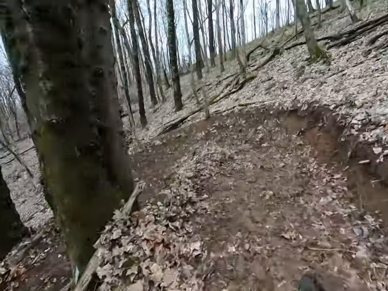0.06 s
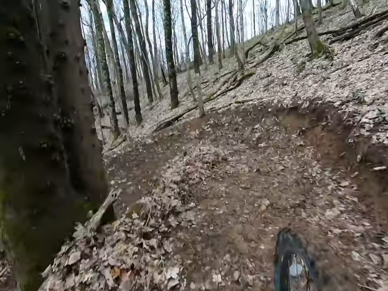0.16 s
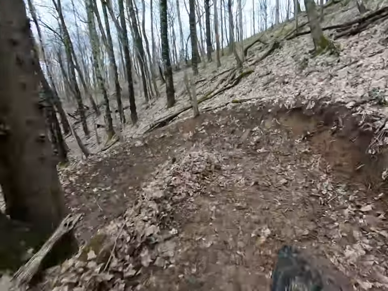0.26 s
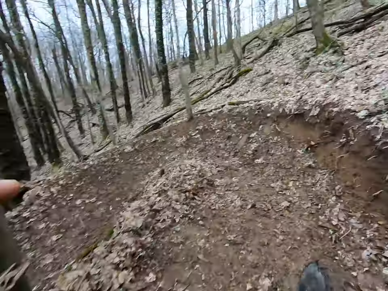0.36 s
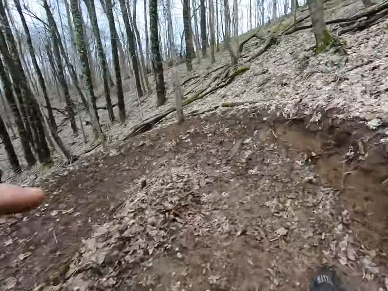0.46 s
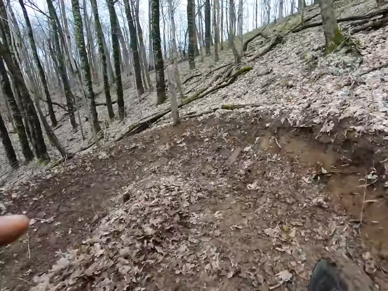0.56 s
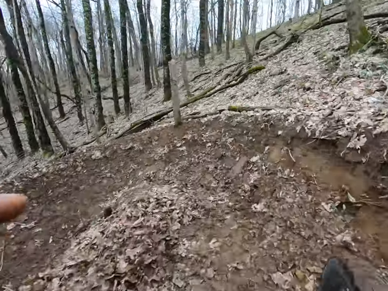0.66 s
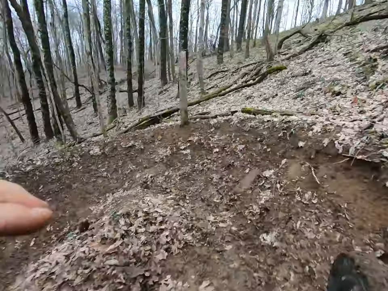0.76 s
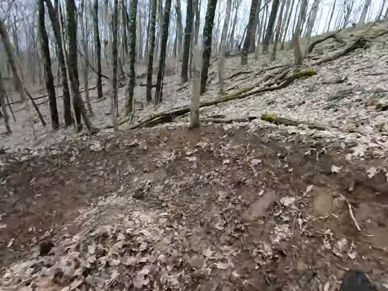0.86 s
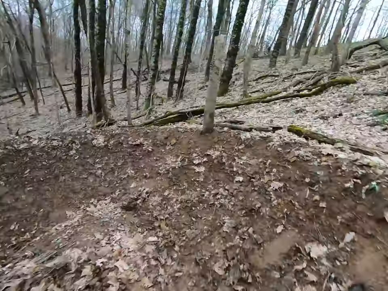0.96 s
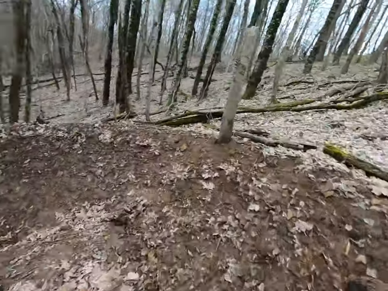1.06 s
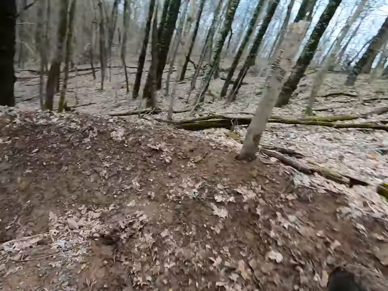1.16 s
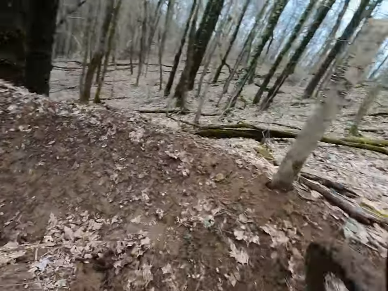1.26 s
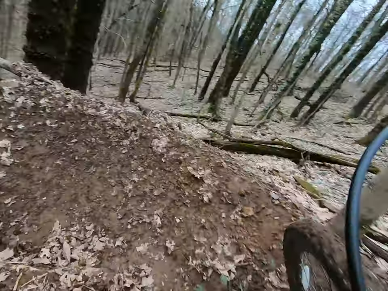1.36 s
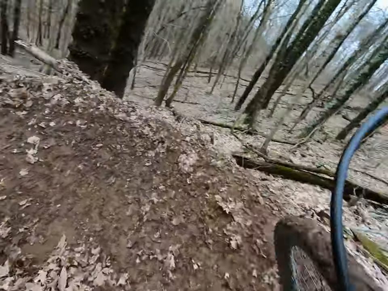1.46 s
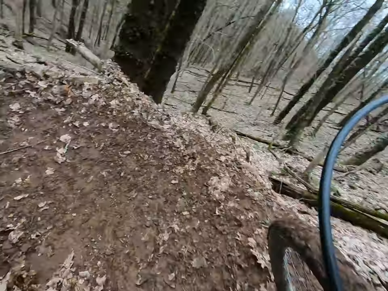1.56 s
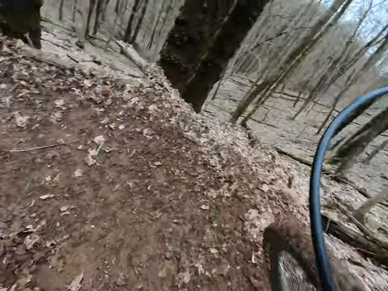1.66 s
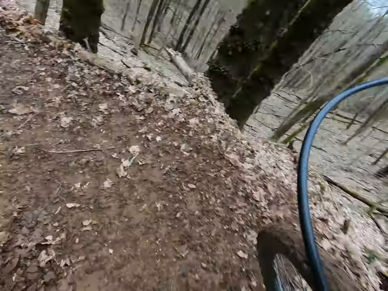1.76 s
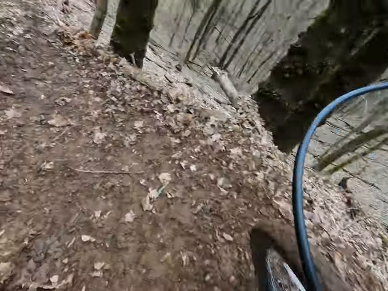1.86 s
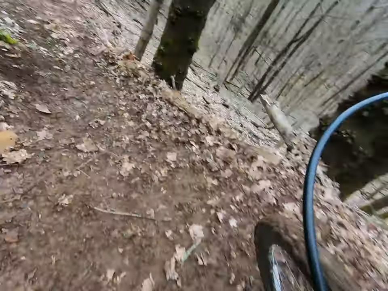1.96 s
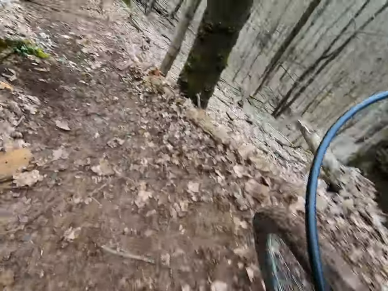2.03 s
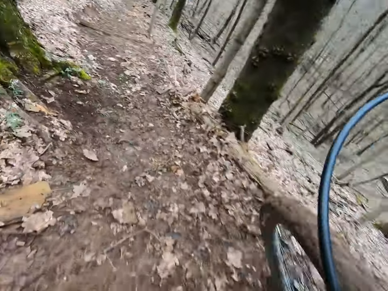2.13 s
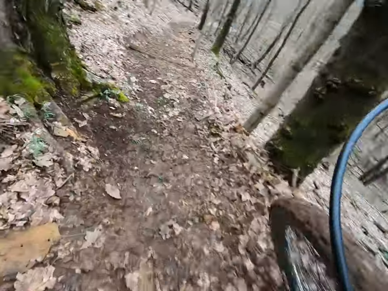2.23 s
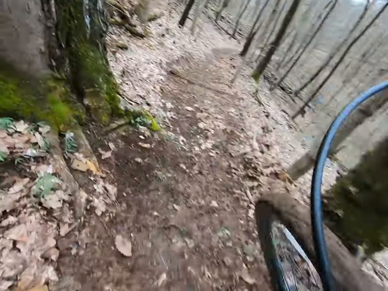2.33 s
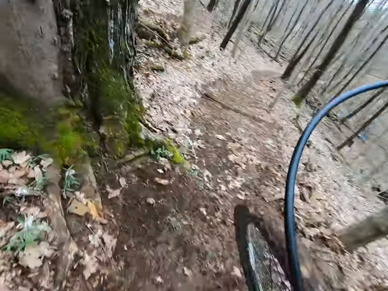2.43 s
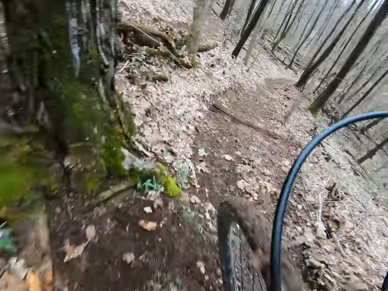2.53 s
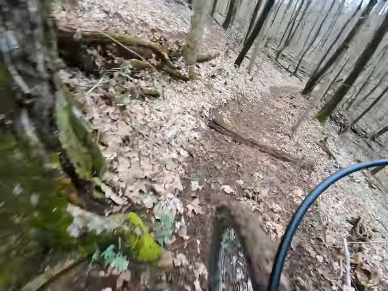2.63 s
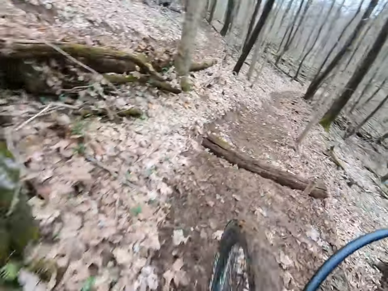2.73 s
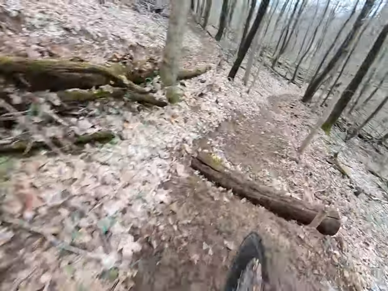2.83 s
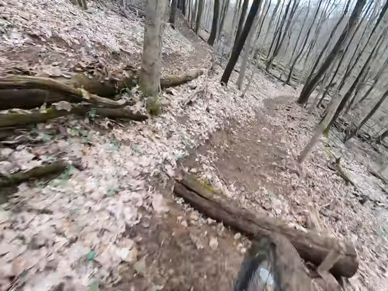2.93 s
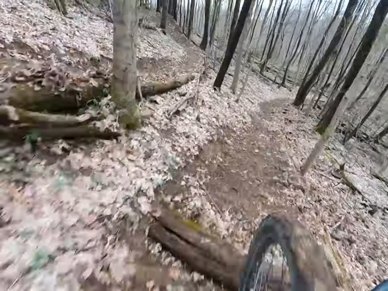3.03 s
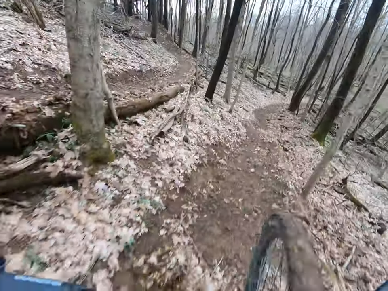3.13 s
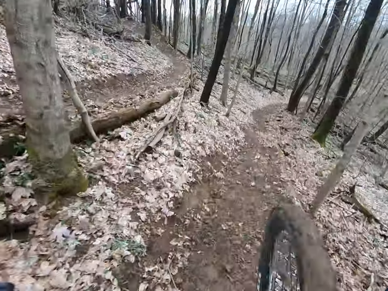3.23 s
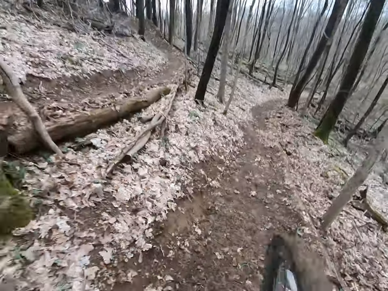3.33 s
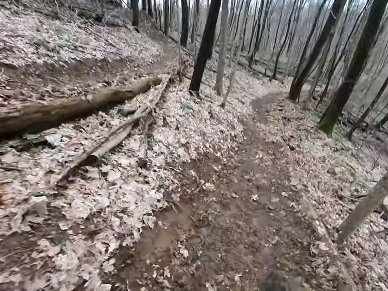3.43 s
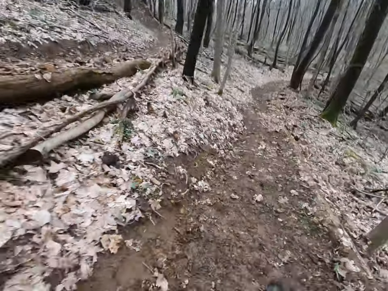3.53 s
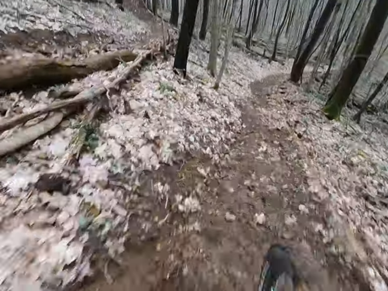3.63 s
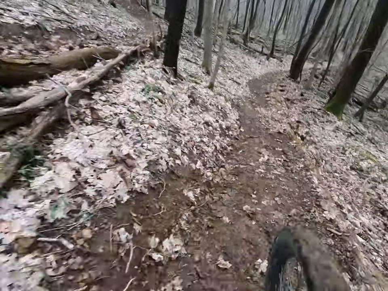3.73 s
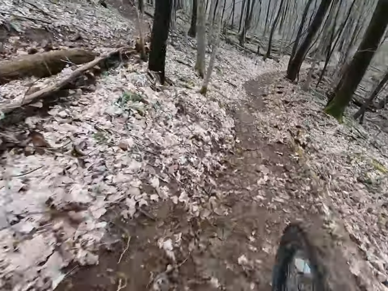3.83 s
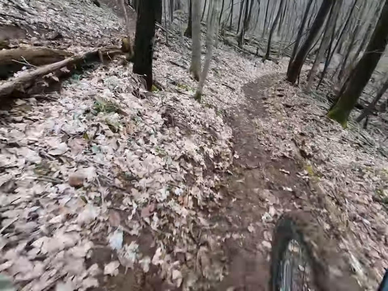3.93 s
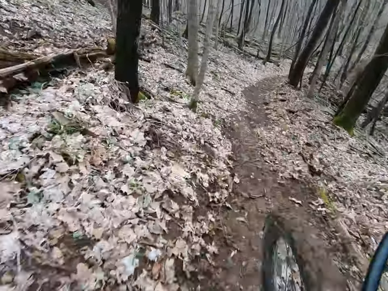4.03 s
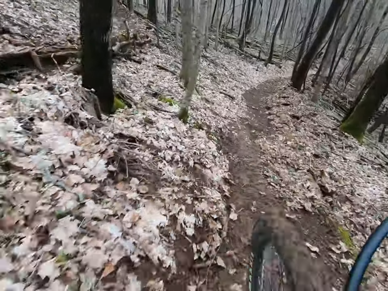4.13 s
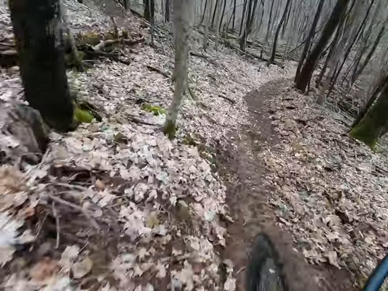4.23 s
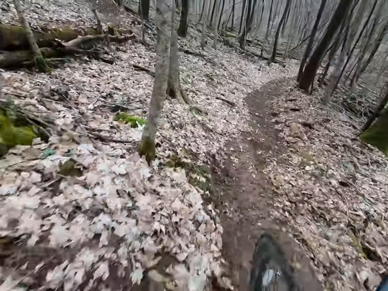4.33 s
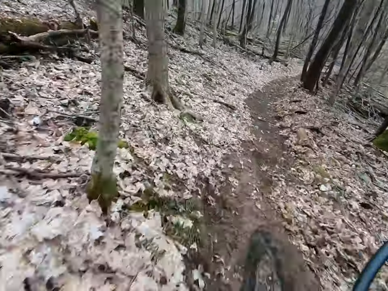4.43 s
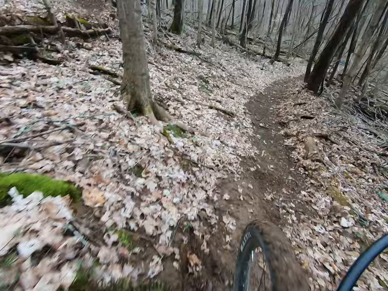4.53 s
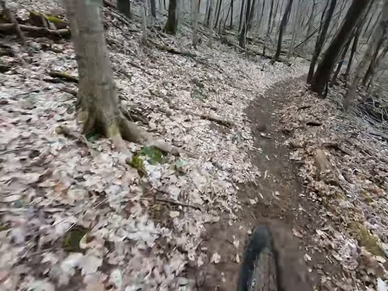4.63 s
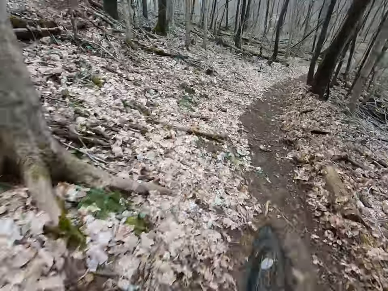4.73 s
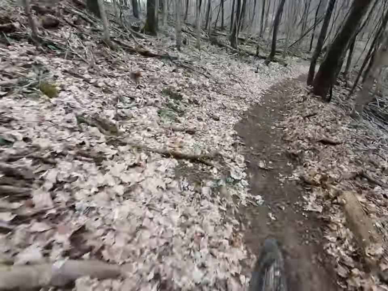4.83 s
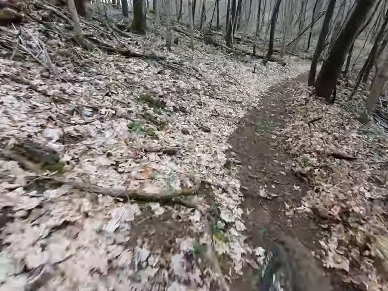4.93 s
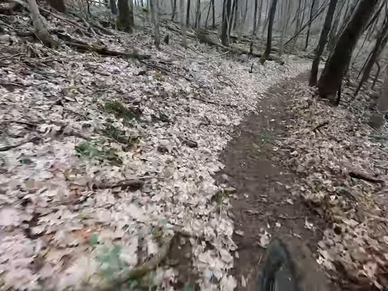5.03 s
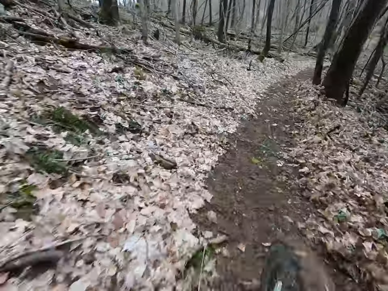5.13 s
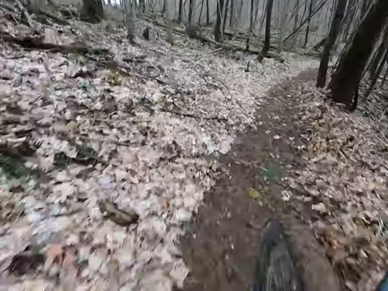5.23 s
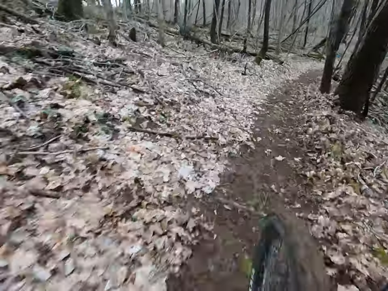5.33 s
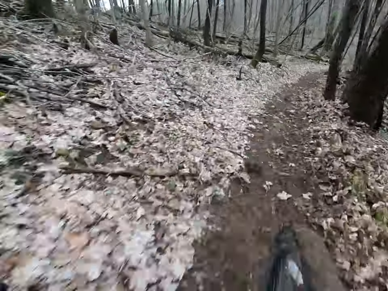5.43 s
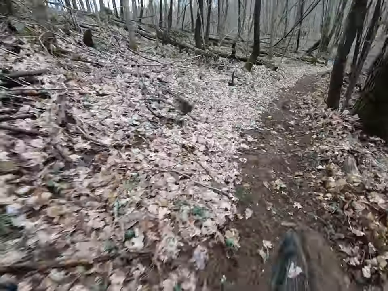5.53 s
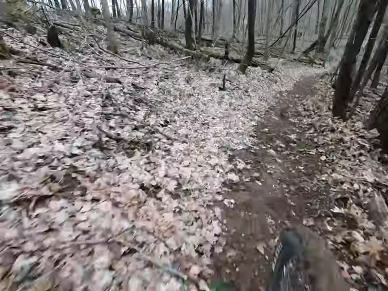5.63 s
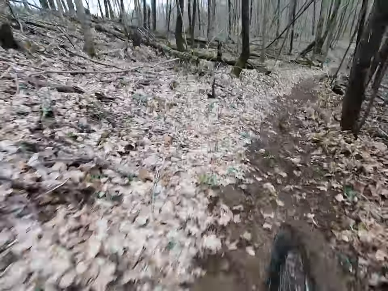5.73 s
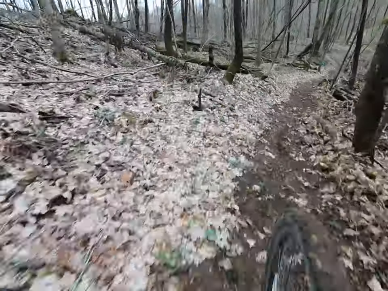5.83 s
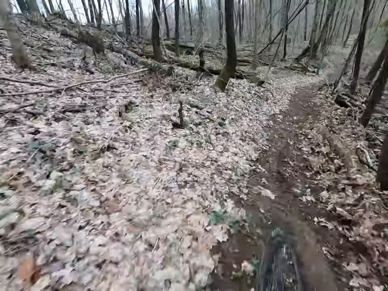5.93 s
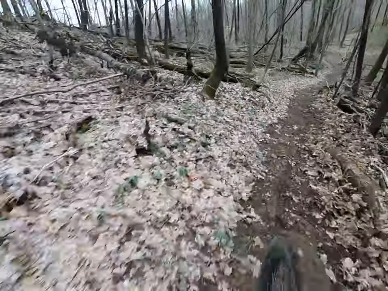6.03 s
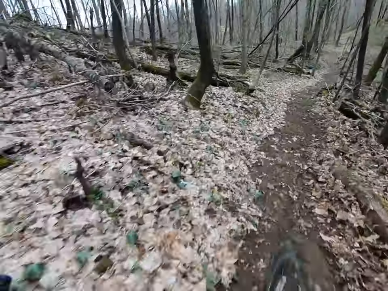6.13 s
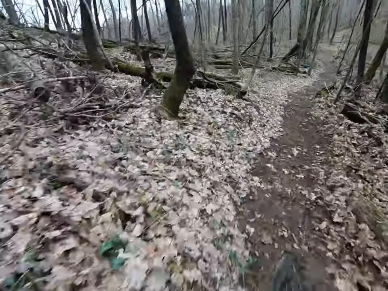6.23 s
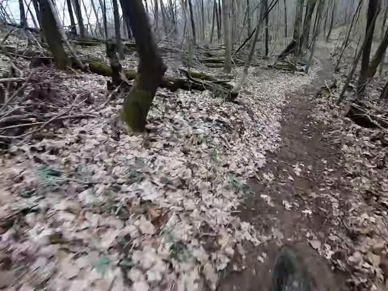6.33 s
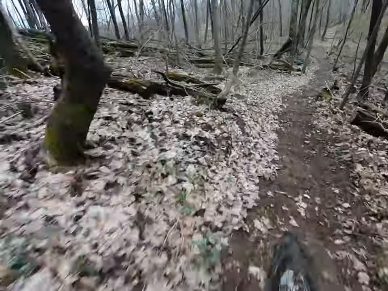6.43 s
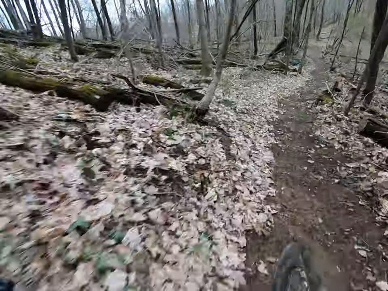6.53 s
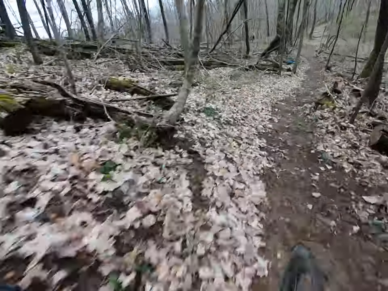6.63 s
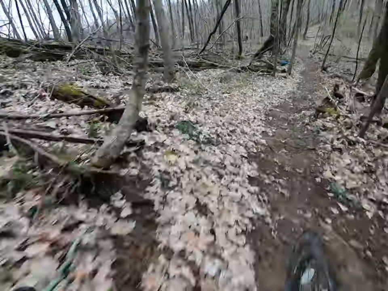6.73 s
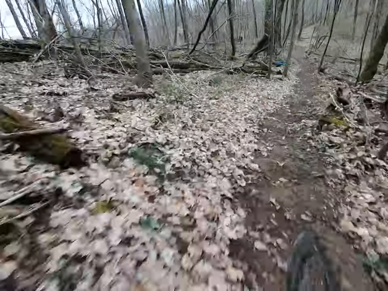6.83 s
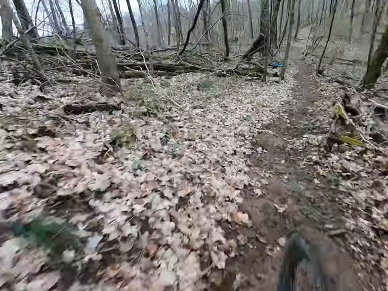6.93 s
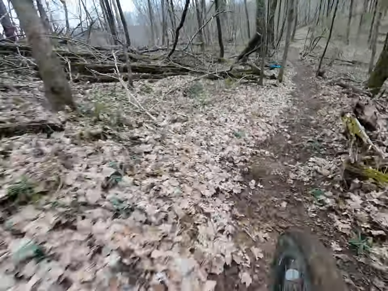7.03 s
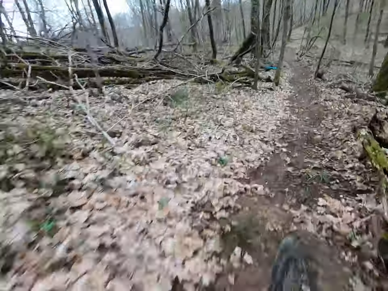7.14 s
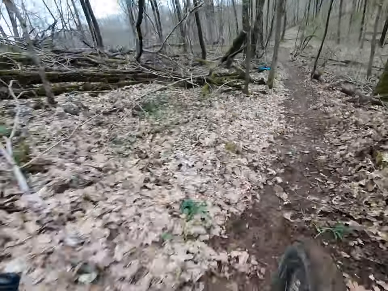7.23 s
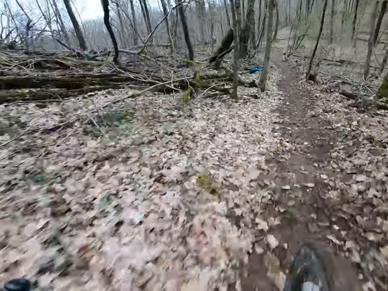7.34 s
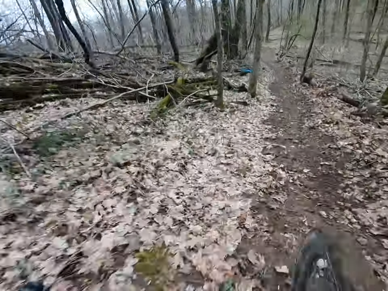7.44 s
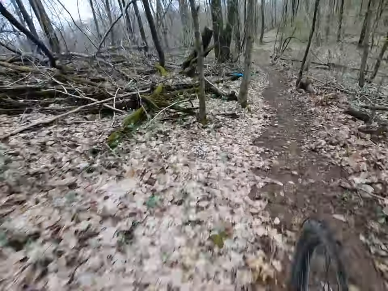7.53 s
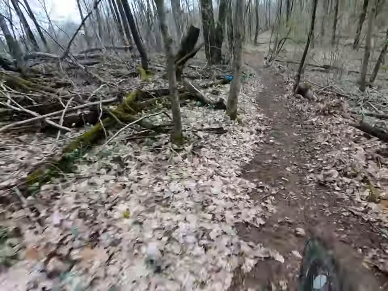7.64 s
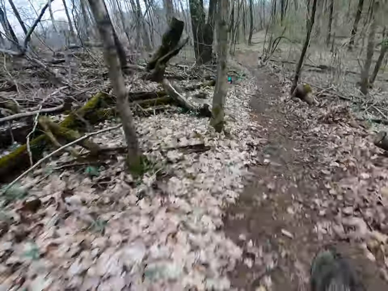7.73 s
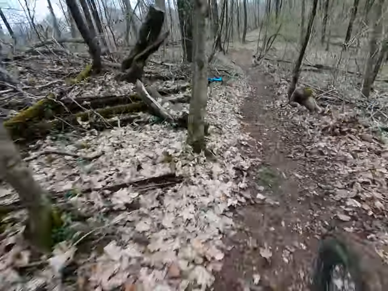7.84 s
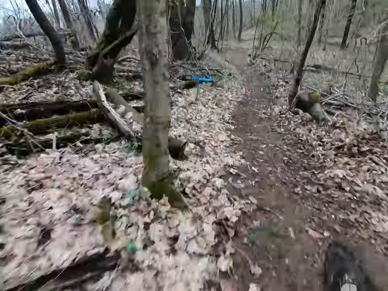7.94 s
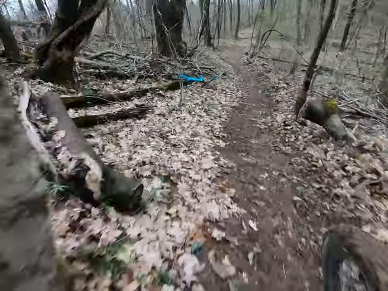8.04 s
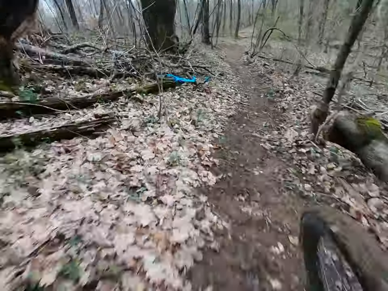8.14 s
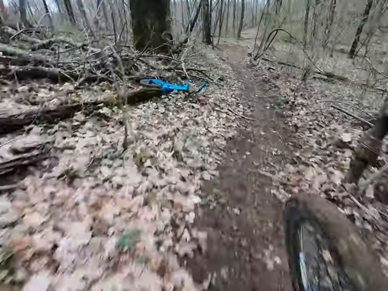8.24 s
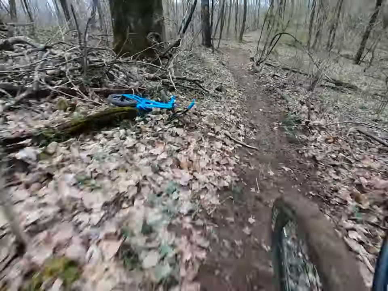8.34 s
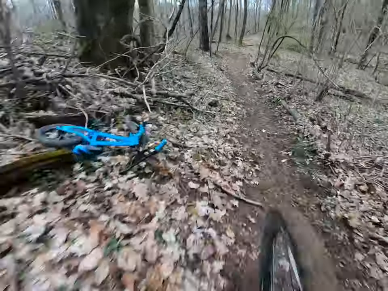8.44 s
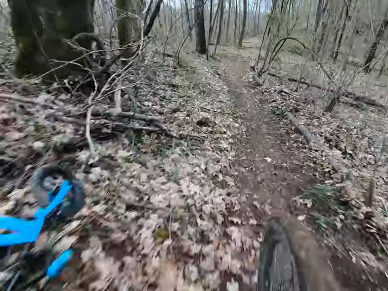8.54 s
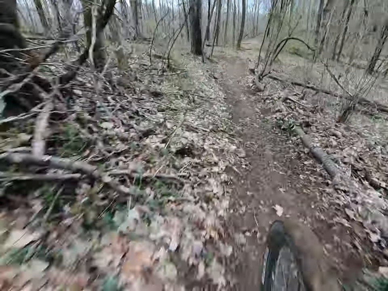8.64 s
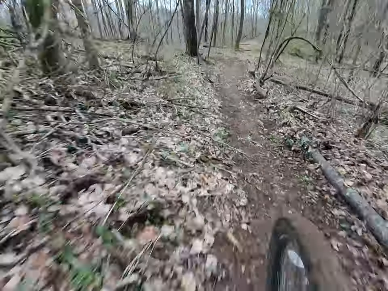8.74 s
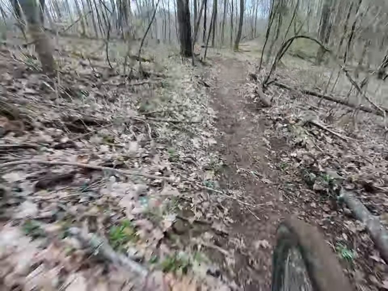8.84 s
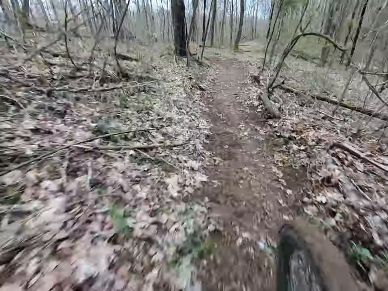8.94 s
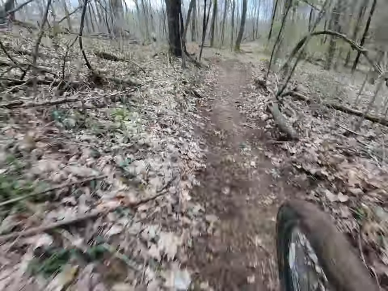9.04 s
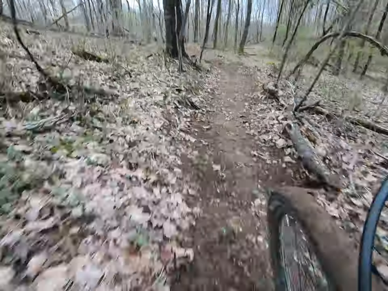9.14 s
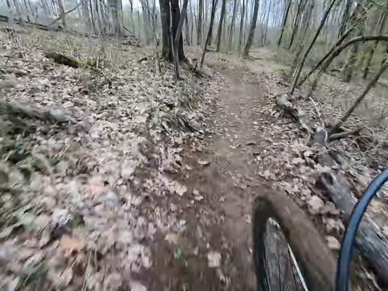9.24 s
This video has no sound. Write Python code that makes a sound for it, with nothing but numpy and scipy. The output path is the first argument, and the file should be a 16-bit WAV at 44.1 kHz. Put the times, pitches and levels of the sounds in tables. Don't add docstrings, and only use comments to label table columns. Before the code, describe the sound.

A very faint rising sigh from the fork opens the ride, over deep, uneven wind rumble and a low frame hum. At 0.2-0.4 s a tight burst of dull root knocks and a short leaf skid hits, with small metallic ticks. From 0.5 to 1.8 s it is calmer: soft bumps, sparse leaf crackle, gusts. One hard, hollow crack lands at 1.9 s, then quieter rolling. Around 3.2 s another skid and knocks rush by. At 3.6-3.95 s comes the loudest event: rapid clacks, a bright chain whip at 3.83 s, scraping leaves, and thin high metal ringing that fades over seconds. From about 4.3 s to the end near 9.3 s the bike goes fast: fuller bassy wind, dense dry crackling, snapping stems, irregular cable slaps and ticks, with rounded tyre thuds strongest around 7 to 7.8 s. Everything is close and dry, with faint foliage hiss behind, and cuts off still moving.

```python
import sys
import numpy as np
from scipy import signal
from scipy.fft import rfft, irfft
from scipy.io import wavfile
from scipy.ndimage import uniform_filter1d

SR = 44100
rng = np.random.default_rng(int(sys.argv[2]) if len(sys.argv) > 2 else 0)


def wav_out(sig):
    wavfile.write(sys.argv[1], SR, np.round(np.clip(np.atleast_2d(sig).T, -1, 1) * 32767).astype(np.int16))


def amplitude_ratio(level_db):
    exponent = np.asarray(level_db, float) / 20
    return 10 ** exponent


N = 409248

THUMP_HZ, RUSH_HZ, BODY_HZ, UPPER_HZ, BRIGHT_HZ = 90, 350, 1160, 2600, 4950

# t/s, level/dB
WIND = [(0, -27.5), (.18, -27), (.33, -17.5), (.48, -32.5), (.6, -22), (.69, -28.5), (.91, -30),
        (.96, -18.5), (1.1, -21), (1.18, -25), (1.3, -22), (2.14, -22), (2.6, -28.5), (3.15, -18),
        (3.56, -27.5), (3.68, -19), (4.3, -20.5), (9.28, -17.5)]
# f/Hz, density/dB
RUMBLE_SLOW = [(12, -36.5), (20, -11.5), (59, 8.5), (91, -6.5), (227, -7), (310, -16), (363, -29.5),
               (425, -25), (506, -31.5), (592, -25.5), (658, -35.5), (983, -35), (1150, -36.5),
               (1300, -48.5), (1690, -89), (2860, -120)]
# f/Hz, density/dB
RUMBLE_FAST = [(12, -25), (20, -3.5), (49, 9), (81, -1), (113, -2.5), (157, -9), (215, -14.5), (256, -18.5),
               (472, -30.5), (756, -34), (933, -38.5), (1300, -27.5), (1690, -71), (2860, -120)]


def rumble():
    wind_db, = in_time(WIND)
    fast = ride_speed()
    bump, bump_rush = wheel_load()
    skid, _ = skids()
    thump_db = wind_db - 13.5 * (1 - fast) - 3 * fast
    thump = np.hypot(bump, amplitude_ratio(thump_db))
    rolling = amplitude_ratio(tread_load() + 4.5 * fast)
    rush = np.sqrt(rolling ** 2 + bump_rush ** 2 + (amplitude_ratio(-8.5) * skid) ** 2)

    white = rng.standard_normal(N)
    slow_air, fast_air = colour(white, RUMBLE_SLOW), colour(white, RUMBLE_FAST)
    parts = []
    for low_hz, high_hz in [(15, THUMP_HZ), (THUMP_HZ, RUSH_HZ), (RUSH_HZ, BODY_HZ)]:
        slow = rms_one(soft_band(slow_air, low_hz, high_hz, order=3))
        quick = rms_one(soft_band(fast_air, low_hz, high_hz, order=3))
        parts.append((1 - fast) * slow + fast * quick)
    deep, middle, high = parts
    roar = band(resonance(white, 1280, 900), 698, 2970, order=4)
    high = high + amplitude_ratio(-11.5) * fast * rms_one(roar)
    deep = rms_one(deep / np.sqrt(uniform_filter1d(deep ** 2, size=3000) + 3.7))
    middle = rms_one(middle / np.sqrt(uniform_filter1d(middle ** 2, size=2500) + 3.6))

    gust = drift(24)
    deep_gain = amplitude_ratio(wind_db + 0.3)
    middle_gain = thump * amplitude_ratio(2.0 + 2.55 * gust)
    high_gain = rush * amplitude_ratio(0.5 + 1.48 * gust + 2.0 * drift(25))
    return deep_gain * deep + middle_gain * middle + high_gain * high


# t/s, share/1
SPEED = [
    (0, 0.15),
    (2.6, 0.13),
    (3.2, 0.47),
    (4.6, 0.85),
    (9.28, 0.83),
]


def ride_speed():
    return in_time(SPEED)[0]


# t/s, hold/s, thump level/dB, rush share/dB
BUMPS = [(0, 0.11, -35, -34), (.26, 0.14, -25.5, -10), (.51, 0.085, -24.5, -38), (.74, 0.086, -32, -31),
         (1.89, 0.17, -21.5, -20), (2.02, 0.05, -18.5, -35), (2.15, 0.13, -19, -25),
         (2.35, 0.14, -33.5, -35), (2.75, 0.14, -26, -16.5), (2.9, 0.21, -24, -9),
         (3.14, 0.049, -19.5, -11.5), (3.22, 0.12, -22.5, -6), (3.31, 0.021, -27.5, 1.5),
         (3.4, 0.089, -30, -12.5), (3.76, 0.16, -21, -13.5), (4.02, 0.12, -20, -16),
         (4.4, 0.12, -33.5, -2.5), (4.9, 0.13, -26, -21), (5.02, 0.068, -20.5, -9.5), (5.75, 0.1, -34, -11),
         (6.35, 0.086, -24.5, -33), (6.62, 0.084, -22.5, -16), (6.84, 0.051, -24.5, -12),
         (7.255, .035, -22, -9.5), (8.42, 0.049, -26, -6), (8.55, 0.058, -22.5, -13),
         (7.4, 0.15, -29, -7.5), (7.8, 0.035, -21.5, -13), (7.95, 0.36, -26, -8.5), (8.3, 0.45, -28, -6.5),
         (8.95, 0.19, -20.5, -26)]


def wheel_load():
    return held(BUMPS, attack_s=0.011, fade_db_per_s=249)


# t/s, peak level/dB, f/Hz
THUDS = [(0.525, -15, 227), (2.029, -32, 170), (2.545, -21.5, 213), (5.051, -36, 151), (6.364, -21, 159),
         (6.847, -15, 150), (6.976, -10, 154), (7.435, -11, 275), (7.827, -9.5, 216)]


def thuds():
    t, out = np.arange(SR // 10) / SR, np.zeros(N)
    noise = rng.standard_normal((len(THUDS), len(t)))
    for (s, db, hz), n in zip(THUDS, noise):
        puff = rms_one(resonance(n, hz * 1.6, 640)) * amplitude_ratio(-5.0 - 60 * t / 0.08)
        cycles = np.sin(2 * np.pi * hz * t) * amplitude_ratio(-60 * t / 0.14)
        add(out, s, amplitude_ratio(db - 5.0) * (cycles + puff) * np.minimum(t / 0.0043, 1))
    return signal.sosfilt(signal.butter(4, 1300, fs=SR, output="sos"), out)


# f/Hz, density/dB
CRACKLE_SLOW = [(590, -36), (1000, 0.5), (1230, 1), (1490, -6.5), (2170, -6.5), (2410, -11.5), (3080, -7.5),
                (3320, -13.5), (3730, -9), (4680, -24), (6080, -41), (10300, -120)]
# f/Hz, density/dB
CRACKLE_FAST = [(590, -33), (1000, -8.5), (1220, 1.5), (1480, 0), (1650, 2), (2850, -7), (3180, -3.5),
                (3780, -4), (4110, -9.5), (4680, -14.5), (6080, -37), (10300, -120)]
# t/s, level/dB
DRYNESS = [(0, 0.1), (.45, -1.5), (.62, -5), (1.0, 1.7), (2.2, 2), (3.9, -3), (5.2, 0.5), (7.2, -0.5),
           (9.28, 0.7)]


def leaves():
    tread_db, fast = tread_load(), ride_speed()
    skid, bright = skids()
    crackle_level = np.hypot(skid, amplitude_ratio(tread_db))
    rustle_db = tread_db - 19.5 + (1 - fast) + in_time(DRYNESS)[0]
    rustle_level = np.hypot(bright, amplitude_ratio(rustle_db))

    sparse = np.clip((-24 - 20 * np.log10(crackle_level)) / 16, .25, 1)
    jolt_db = (0.7 * drift(9.2) + 1.96 * drift(23)) * sparse
    snaps = grains(per_s=2500, spread_db=4.5, smooth_db=4.5) * amplitude_ratio(jolt_db)
    breaks = amplitude_ratio(-6 + 4 * drift(6)) * sparse * twigs(per_s=260, spread_db=4)
    bed = rms_one(housing(snaps, direct_db=15.0)) + breaks
    slow = rms_one(band(colour(bed, CRACKLE_SLOW), BODY_HZ, BRIGHT_HZ))
    quick = rms_one(band(colour(bed, CRACKLE_FAST), BODY_HZ, BRIGHT_HZ))
    crackle = rms_one((1 - fast) * slow + fast * quick)

    pricks = amplitude_ratio(-11) * grains(per_s=45, spread_db=0, smooth_db=-37)
    rustle = rms_one(bright_colour(rms_one(snaps) * amplitude_ratio(1.6 * drift(24)) + pricks))
    return crackle_level * crackle + rustle_level * rustle


# t/s, level/dB
TREAD = [(0, -43.5), (.07, -60), (.45, -44), (.6, -45), (1.8, -42.5), (2.35, -44), (2.8, -45),
         (3.05, -47.5), (3.36, -55), (3.6, -51.5), (4.05, -44), (5.0, -42.5), (5.6, -39.5), (6.0, -41),
         (6.8, -40), (7.7, -39.5), (8.65, -42), (9.28, -37)]


def tread_load():
    return in_time(TREAD)[0]


# t/s, hold/s, level/dB, bright share/dB
SKIDS = [(.18, 0.049, -30.5, -31), (.265, 0.094, -27.5, -28.5), (.335, 0.081, -37, -17),
         (1.918, 0.012, -24, -37), (2.46, 0.019, -49, -8), (3.1, 0.14, -39, -20), (3.2, 0.057, -22.5, -24),
         (3.28, 0.048, -41.5, -20), (3.615, 0.047, -27, -31), (3.66, 0.036, -31, -26),
         (3.75, 0.048, -33, -20.5), (3.79, 0.017, -22.5, -22), (3.81, 0.038, -19, -21),
         (3.86, 0.059, -26.5, -22.5), (3.912, 0.01, -22.5, -18), (3.95, 0.071, -43, -28),
         (4.41, 0.015, -40, -13), (5.36, 0.072, -35, -16), (5.5, 0.028, -45.5, -19),
         (5.65, 0.085, -37.5, -16.5), (5.8, 0.032, -37, -19), (5.86, 0.034, -27.5, -24),
         (6.06, 0.0088, -39, -8), (6.815, 0.0067, -29.5, -12), (7.0, 0.057, -46, -9),
         (7.15, 0.071, -38.5, -20), (8.06, 0.025, -40, -13), (8.59, .03, -33, -29), (8.99, 0.018, -38, -25),
         (9.07, 0.028, -38, -10)]


def skids():
    return held(SKIDS, attack_s=0.0089, fade_db_per_s=598)


def twigs(per_s, spread_db):
    sizes = amplitude_ratio(spread_db * np.minimum(rng.exponential(1, N), 3)) * (rng.random(N) < per_s / SR)
    dealt = rng.integers(0, 8, N)
    noise, burst = rng.standard_normal(N), swell(0.011, 0.44)
    out = np.zeros(N)
    for k, hz in enumerate(np.geomspace(1250, 4200, 8)):
        envelope = signal.oaconvolve(sizes * (dealt == k), burst)[:N]
        out += resonance(noise * envelope + 1e-18, hz, hz * 0.47)
    return rms_one(out)


# t/s, peak level/dB, f/Hz
SNAPS = [(0.4083, -21, 1430), (0.5217, -33, 1410), (0.5751, -34, 1690), (0.7268, -41, 3800),
         (1.006, -25.5, 1920), (1.0615, -25, 3500), (1.3224, -27, 3270), (1.357, -29, 2100),
         (1.6668, -28.5, 1400), (2.106, -42, 1870), (2.1839, -32, 1720), (2.4037, -33, 2030),
         (2.5411, -31, 2160), (2.573, -23, 1690), (2.7666, -34, 2710), (2.962, -32, 1680),
         (3.1193, -27, 2230), (4.1305, -44, 1400), (4.217, -22, 1390), (4.342, -31, 3680),
         (4.435, -20.5, 3820), (4.567, -30, 1750), (4.6103, -20.5, 1580), (4.6753, -20, 1400),
         (4.7587, -36, 2000), (4.843, -27, 1680), (5.0994, -28, 1400), (5.1706, -29, 1640),
         (5.3203, -21.5, 2230), (5.3775, -17, 1540), (5.436, -21, 3650), (5.467, -20, 3180),
         (5.6208, -23.5, 1630), (5.678, -22, 2210), (5.8059, -19.5, 3180), (5.8371, -28, 1580),
         (6.02, -20.5, 1770), (6.11, -36, 3650), (6.187, -24, 1400), (6.253, -21.5, 1600),
         (6.518, -25, 3750), (6.6218, -26, 1600), (6.66, -23, 2100), (6.885, -18.5, 1620),
         (7.0474, -32, 1700), (7.1442, -22, 1730), (7.2105, -18, 1590), (7.2767, -32, 1670),
         (7.6051, -22.5, 1410), (7.9384, -25, 1420), (8.0371, -33, 2200), (8.1469, -29, 1420),
         (8.31, -27, 1850), (8.343, -20.5, 1570), (8.9613, -23, 3410), (9.035, -41, 1900),
         (9.158, -26, 1650), (9.207, -22, 1700), (9.2549, -18.5, 1720)]


def stem_snaps():
    return cracks(SNAPS, length=0.012, width_hz=480, wide_db=-5.0, ring_db=-6)


# t/s, peak level/dB, upper share/dB
KNOCKS = [(0.188, -32, -18), (0.2724, -33, -6), (0.2834, -23, -3), (0.304, -12.5, -18),
          (0.32, -10.5, -13.5), (0.3703, -8.5, -12), (0.407, -18.5, -6), (0.587, -21.5, -10),
          (0.724, -25, -15), (0.801, -24.5, -10.5), (0.891, -22, -13), (1.267, -26, -9.5), (1.935, -7, -19),
          (1.943, -14, -23), (2.4856, -18.5, -11.5), (2.703, -24, -13.5), (2.9798, -22, -12),
          (3.151, -18, -13), (3.1678, -17, -12.5), (3.202, -22, -23), (3.6347, -16, -3.5),
          (3.712, -15.5, -15), (3.795, -15, -9), (3.814, -18, -2), (3.827, -8.5, -11.5), (3.863, -22, -6),
          (3.884, -7.5, -14), (3.9215, -9.5, -11.5), (4.009, -23, -10)]
# t/s, peak level/dB, upper share/dB
SLAPS = [(4.355, -23, -6.5), (4.423, -20.5, -3), (4.539, -20.5, -7), (4.827, -38, -16), (5.005, -20.5, -12),
         (5.235, -17.5, -16.5), (5.4108, -14.5, -7.5), (5.558, -17.5, -14), (5.5967, -18, -14),
         (5.7093, -18, -6), (6.0666, -19, 0.5), (6.1076, -25.5, 0), (6.372, -21, -11.5), (6.43, -23, -13),
         (6.673, -19.5, -10), (6.805, -22, -9), (6.824, -21.5, -1.5), (6.9671, -20.5, -7),
         (7.101, -19, -12), (7.21, -21, -10.5), (7.262, -31, -18), (7.344, -20, -15), (7.427, -18.5, -9.5),
         (7.745, -18, -7.5), (7.821, -14.5, -13), (8.069, -20.5, -10), (8.608, -21.5, -8), (8.998, -27, -4),
         (9.085, -18.5, -10), (9.21, -21, -13)]


def knocks():
    low, upper = np.zeros((2, N))
    for rows, length in [(KNOCKS, 0.016), (SLAPS, 0.012)]:
        for s, db, upper_db in rows:
            add(low, s - .0025, amplitude_ratio(db - 13.0) * swell(length, 0.57))
            add(upper, s - .0025, amplitude_ratio(db + upper_db - 6.5) * swell(length * 1.14, 0.46))
    clatter = grains(per_s=5000, spread_db=1.5, smooth_db=1.5)

    def body(shape, low_hz, high_hz):
        driven, steady = [band(housing(x * clatter, direct_db=-30), low_hz, high_hz, order=6)
                          for x in (shape, 0.75)]
        return driven / np.std(steady)

    dull = band(low * clatter, 490, BODY_HZ, order=2) * amplitude_ratio(5.0)
    edge = amplitude_ratio(-18.5) * bright_colour(upper * clatter)
    return dull + edge + body(low, BODY_HZ, UPPER_HZ) + body(upper, UPPER_HZ, BRIGHT_HZ)


# f/Hz, width/Hz, level/dB
HOUSING = [(1217, 42, -5.5), (1400, 38, -4.5), (1750, 360, -11.5), (2210, 190, -12.5), (3180, 200, 2),
           (3650, 155, 2.5), (4650, 200, -36.5)]


def housing(x, direct_db):
    return amplitude_ratio(direct_db) * x + sum(amplitude_ratio(db) * resonance(x, hz, width) for hz, width, db in HOUSING)


# t/s, peak level/dB, f/Hz
WHIPS = [(3.626, -23, 3740), (3.638, -14, 3630), (3.661, -17, 3530), (3.697, -25, 3820), (3.712, -24, 3250),
         (3.815, -18, 3750), (3.827, -8, 3720), (3.8345, -1, 3700), (3.8455, -14, 3280),
         (3.8627, -11, 3660), (3.872, -14, 3700), (3.9106, -17.5, 3580), (3.9291, -7.5, 3620),
         (3.9455, -27, 3800), (3.264, -12, 1900), (3.151, -23, 2000), (3.169, -21, 2180),
         (1.933, -11, 2540), (1.9405, -3.5, 2120), (1.956, -16, 1600), (.1983, -26, 3570),
         (.2093, -19, 3700), (.2707, -23, 3810), (.3405, -19, 3800), (.355, -19, 4300), (3.208, -17, 2020),
         (7.3455, -26, 3470), (9.274, -19, 3500), (9.218, -23, 3300)]


def chain_whips():
    return cracks(WHIPS, length=0.0057, width_hz=420, wide_db=-14, ring_db=-3.5)


# t/s, peak level/dB, f/Hz
TICKS = [(0.321, -35, 5670), (0.3706, -29.5, 7400), (0.412, -35, 7260), (1.9275, -44, 7400),
         (2.6201, -44, 5700), (.804, -52, 5550), (.915, -51, 7600), (1.045, -48, 7000), (1.268, -44, 7500),
         (1.385, -50, 4900), (2.479, -45, 7020), (3.1682, -43, 5530), (3.648, -49, 9000),
         (4.485, -50, 9200), (4.76, -47, 8000), (4.975, -55, 7600), (5.1626, -53, 8000), (5.845, -45, 7010),
         (5.861, -43, 7550), (7.048, -43, 8330), (7.429, -42, 5270), (8.104, -45, 6890),
         (8.7425, -46, 7550), (8.963, -44, 6930), (3.213, -33, 6500), (3.638, -45, 6850),
         (3.828, -21, 5440), (3.836, -23, 6770), (3.8358, -20.5, 9900), (3.888, -39, 9600),
         (3.8855, -28, 6700), (3.918, -36, 7260), (4.425, -35, 7800), (5.3657, -47, 8070),
         (5.3808, -36, 6420), (5.412, -34, 8600), (5.516, -33.5, 8600), (5.527, -28, 6200),
         (5.6533, -41.5, 7200), (5.688, -31.5, 7900), (5.744, -28.5, 7760), (5.8086, -37, 5500),
         (5.8792, -34, 7190), (6.071, -33, 5500), (6.07, -31, 7800), (6.2063, -41, 6830),
         (6.8297, -30, 5370), (8.0692, -39, 5820), (9.0824, -33, 8200), (9.085, -23, 8130),
         (1.9335, -46, 7360), (1.9394, -48, 7300), (1.9505, -50, 7300), (9.275, -43, 7000),
         (3.864, -36, 7500)]


def ticks():
    wide, out = np.zeros((2, N))
    burst = np.zeros(800)
    add(burst, 0, swell(0.012, 0.34))
    for s, db, hz in TICKS:
        hit = burst * rng.standard_normal(800)
        add(wide, s - .001, amplitude_ratio(db - 2.5) * hit)
        add(out, s - .001, amplitude_ratio(db + 5.0) * resonance(hit, hz, 700))
    return bright_colour(wide) + out


# t/s, f/Hz, level/dB, T60/s
METAL = [(0, 7100, -73, 1.3), (.19, 7100, -61, .3), (.272, 1216, -28, .59), (.41, 7440, -55, .23),
         (.78, 1260, -43, .6), (1.5, 1320, -51.5, 6), (3.25, 7200, -66, 1.6), (3.25, 6850, -66, 1.4),
         (3.27, 4770, -63, .8), (3.2, 7300, -48, .25), (3.64, 6950, -59, .4), (3.765, 1258, -32, .2),
         (3.81, 1258, -22, .2), (3.87, 1240, -24, .15), (3.81, 13900, -66, .25), (3.82, 10250, -49, .15),
         (3.84, 6300, -54, .35), (3.84, 6700, -62, 2.4), (3.84, 6870, -67, 3.3), (3.84, 7400, -68, 1.7),
         (3.84, 8330, -64, 2.6), (3.84, 9420, -67, 3.8), (3.84, 10250, -69, 2.6), (3.84, 11900, -82, 3),
         (3.917, 1190, -19, .14), (3.92, 9450, -60, .2), (3.962, 1230, -30, .12), (4.003, 1210, -24, .12),
         (4.2, 8350, -69, .6), (4.21, 6700, -67, .9), (4.25, 1250, -43, .6), (4.45, 7450, -72, 1.5),
         (5.53, 6900, -63, 1.2), (6.069, 3050, -27, .075), (6.06, 7800, -62, .5), (6.2, 7770, -63, 1.2),
         (9.085, 8480, -54, .5), (9.085, 7950, -58, .35)]


def metal():
    t, out = np.arange(SR) / SR, np.zeros(N)
    ends = np.clip(np.minimum(t / 0.0023, 5 - 5 * t), 0, 1)
    for s, hz, db, t60 in METAL:
        width = 100 + 0.017 * hz
        noise = rng.standard_normal(SR + 4000)
        line = rms_one(resonance(resonance(noise, hz, width), hz, width)[4000:])
        add(out, s, amplitude_ratio(db - 60 * t / t60) * ends * line)
    return out


# t/s, f/Hz, level/dB
SIGH = [
    (0, 790, -44),
    (.06, 1060, -49),
    (.12, 1180, -51),
    (.16, 1250, -81),
]


def damper():
    hz, db = in_time(SIGH)
    flutter = rng.standard_normal(N)
    for _ in range(2):
        flutter = signal.lfilter([1], [1, -.975], flutter)
    whistle = rms_one(flutter * np.sin(2 * np.pi * np.cumsum(hz) / SR))
    return amplitude_ratio(db) * whistle * (np.arange(N) < SR // 4)


def forest():
    return amplitude_ratio(-63) * rms_one(band(rng.standard_normal(N), BODY_HZ, BRIGHT_HZ))


# f/Hz, density/dB
RUSTLE_COLOUR = [(3500, -19.5), (4800, 4), (5200, -2.5), (5900, -7.5), (6800, -6.5), (7800, -3.5),
                 (8800, -9), (9700, -14.5), (10400, -12), (11200, -20), (12500, -30.5), (14000, -32),
                 (14800, -39.5), (16000, -55.5)]


def bright_colour(x):
    return colour(x, RUSTLE_COLOUR)


def cracks(rows, length, width_hz, wide_db, ring_db):
    wide, out, burst = np.zeros(N), np.zeros(N), np.zeros(700)
    add(burst, 0, swell(length, 0.38))
    for s, db, hz in rows:
        hit = burst * rng.standard_normal(700)
        add(wide, s - .001, amplitude_ratio(db + wide_db) * hit)
        ring = resonance(resonance(hit, hz, width_hz), hz, 2 * width_hz)
        add(out, s - .001, amplitude_ratio(db + ring_db) * ring / np.abs(ring).max())
    spill = amplitude_ratio(-26.0) * soft_band(wide, BRIGHT_HZ, 8200, order=4)
    return band(resonance(wide, 1800, 2700), 1000, BRIGHT_HZ, order=4) + spill + out


def grains(per_s, spread_db, smooth_db):
    sizes = amplitude_ratio(spread_db * np.minimum(rng.exponential(1, N), 4)) * rng.choice([-1, 1], N)
    snaps = rms_one(sizes * (rng.random(N) < per_s / SR))
    return snaps + amplitude_ratio(smooth_db) * rng.standard_normal(N)


def held(rows, attack_s, fade_db_per_s):
    out, t = np.zeros((2, N)), np.arange(SR) / SR
    for s, hold_s, db, share_db in rows:
        fade_db = fade_db_per_s * np.maximum(t - attack_s - hold_s, 0)
        shape = np.minimum(t / attack_s, 1) * amplitude_ratio(db - fade_db)
        add(out[0], s, shape ** 2)
        add(out[1], s, (amplitude_ratio(share_db) * shape) ** 2)
    return np.sqrt(out)


def swell(length, lean):
    t = np.arange(round(np.clip(length, .004, .12) * SR))
    return np.sin(np.pi * (t / len(t)) ** lean) ** 2


def drift(rate_hz):
    r = np.exp(-2 * np.pi * rate_hz * 8 / SR)
    slow = signal.lfilter([1], [1, -2 * r, r * r], rng.standard_normal(N // 8 + 4002))[4000:]
    return np.interp(np.arange(N) / 8, np.arange(len(slow)), rms_one(slow))


def resonance(x, hz, width):
    r = np.exp(-np.pi * width / SR)
    poles = [1, -2 * r * np.cos(2 * np.pi * hz / SR), r * r]
    return signal.lfilter([(1 - r * r) / 2, 0, (r * r - 1) / 2], poles, x)


def colour(x, points):
    hz, db = np.transpose(points)
    grid = np.linspace(1, SR / 2, 4097)
    cepstrum = irfft(np.log(amplitude_ratio(np.interp(np.log(grid), np.log(hz), db))))
    cepstrum[1:4096] *= 2
    cepstrum[4097:] = 0
    return signal.fftconvolve(x, irfft(np.exp(rfft(cepstrum))))[:N]


def band(x, low_hz, high_hz, order=7):
    sos = signal.ellip(order, 1, 70, [low_hz, high_hz], "band", fs=SR, output="sos")
    return signal.sosfilt(sos, x)


def soft_band(x, low_hz, high_hz, order):
    return signal.sosfilt(signal.butter(order, [low_hz, high_hz], "band", fs=SR, output="sos"), x)


def rms_one(x):
    return x / np.sqrt(np.mean(x ** 2) + 1e-20)


def in_time(rows):
    s, *columns = np.transpose(rows)
    return [np.interp(np.arange(N) / SR, s, c) for c in columns]


def add(track, s, shape):
    i = round(s * SR)
    track[i:i + len(shape)] += shape[:N - i]


def scene():
    ground = rumble() + thuds() + leaves() + stem_snaps()
    bike = knocks() + chain_whips() + ticks() + metal() + damper()
    return (ground + bike + forest())[None]


def band_limit(x):
    return signal.sosfilt(signal.butter(12, 15400, fs=SR, output="sos"), x)


def record(dry):
    rounded = 1.012 * np.tanh(dry / 1.182)
    mix = signal.sosfilt(signal.butter(4, 13800, fs=SR, output="sos"), rounded)
    return band_limit(mix)


dry = scene()
out = record(dry)
wav_out(out)
```